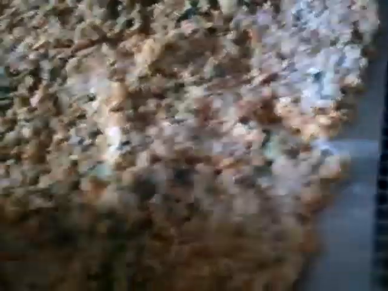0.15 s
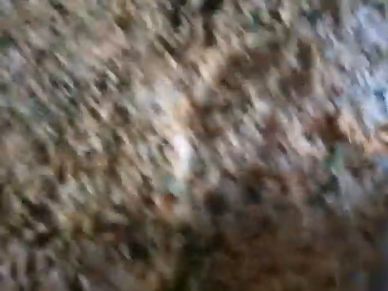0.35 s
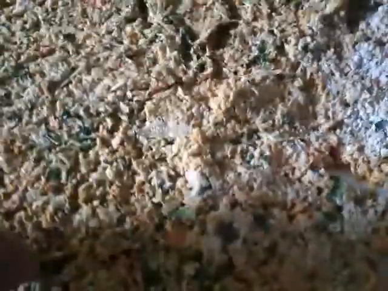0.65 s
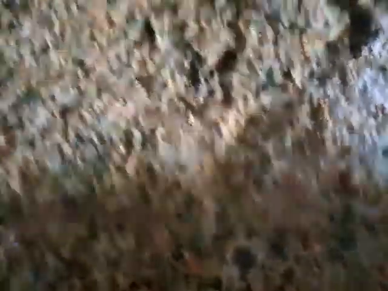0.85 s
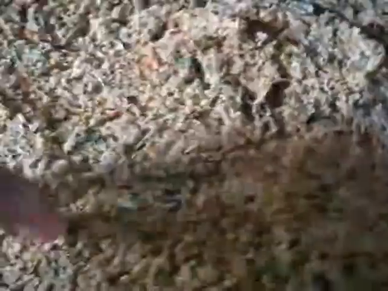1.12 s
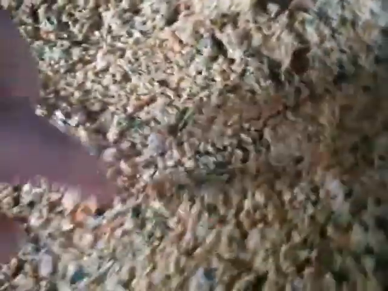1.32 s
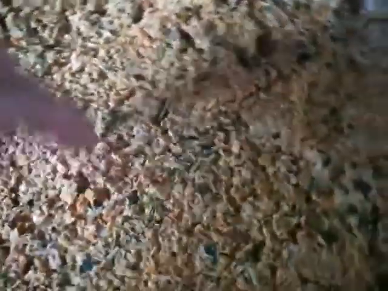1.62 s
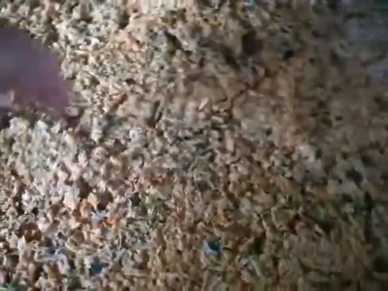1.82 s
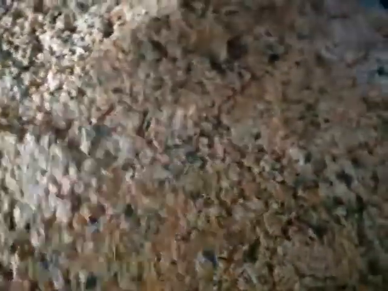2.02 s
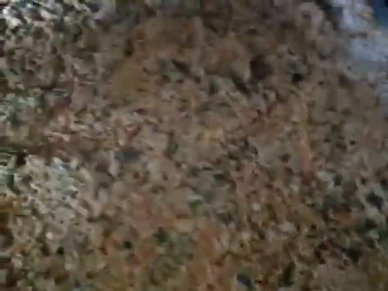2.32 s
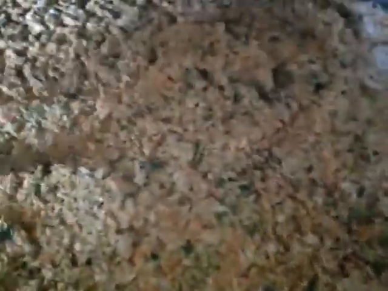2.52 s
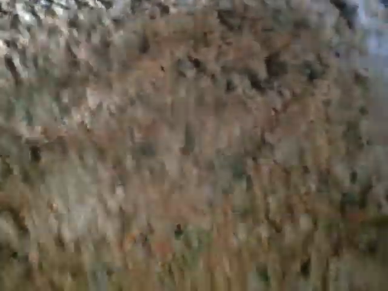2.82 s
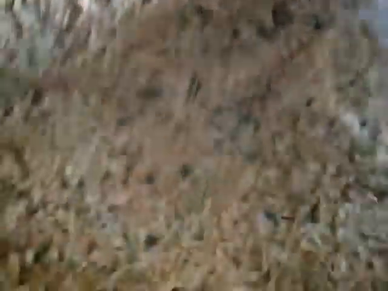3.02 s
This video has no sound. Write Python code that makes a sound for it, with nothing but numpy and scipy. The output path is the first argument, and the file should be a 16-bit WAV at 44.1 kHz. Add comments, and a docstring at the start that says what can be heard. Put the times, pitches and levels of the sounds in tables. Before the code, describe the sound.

Fingers tap and press a brittle salty layer on a tray, giving dry snaps, clicks and fine gritty crumbs, thickening into continuous crackling; close, nearly dry kitchen sound with soft rustle and thin camera whine.

```python
"""Camera hiss, a frame tick and a thin beating whistle run throughout, with paper and hand rustle.
A dried, salty crust on parchment cracks from 0.17 s; a finger rubs softly around 0.2 and 0.8 s.
From 0.21 to 2.78 s ten finger taps click and knock the tray, each leaving crumbs crackling.
From about 2.5 s the cracks, short spiky noise bursts, crowd together and go on to the end.
A faint noise-tail reverb of the kitchen follows taps, crumbs and cracks."""
import sys
import numpy as np
from scipy import signal
from scipy.fft import rfft, irfft, next_fast_len
from scipy.io import wavfile
from scipy.ndimage import map_coordinates

SR = 44100
rng = np.random.default_rng(int(sys.argv[2]) if len(sys.argv) > 2 else 0)


def inscribe(sig):
    """Save sig as 16-bit PCM at rate SR to the path in sys.argv[1].

    A 1-D sig is mono; a 2-D sig holds one channel per row.
    Samples are clipped to [-1, 1] before scaling.
    """
    pcm = np.round(np.clip(np.atleast_2d(sig).T, -1, 1) * 32767)
    wavfile.write(sys.argv[1], SR, pcm.astype(np.int16))


N = 138915

# finger taps, relative levels: start_s, click_db, knock_db, crumbs_db, crumbs_hold_s, crumbs_t60_s
TAP_EVENTS = [(0.211, -5.5, -32.5, -40, 0.019, 0.28), (0.4302, -1.5, -24.5, -39, 0.018, 0.26),
              (1.074, -14.5, -29.5, -45, 0.025, 0.24), (1.2942, -9.5, -23.5, -37, 0.017, 0.2),
              (1.5105, -28.5, -57, -50, 0.01, 0.25), (1.7086, -18.5, -23.5, -40.5, 0.019, 0.2),
              (1.9228, -6.5, -17.5, -35.5, 0.025, .15), (2.2697, -23, -40, -52, 0.011, 0.26),
              (2.5407, -6.5, -20, -35.5, 0.037, 0.091), (2.776, -3.5, -12.5, -36.5, 0.03, 0.21)]
# cracks of the crust, relative levels: start_s, level_db, bass_over_level_db, treble_over_level_db, t60_s
CRACK_EVENTS = [(0.1736, -44.5, 7, -15, 0.012), (0.2409, -51, 4, -4, 0.018),
                (0.253, -47.5, -9, -6.5, 0.0166), (0.271, -32, -29, -19, 0.021),
                (0.2958, -11, -5, 4, 0.013), (0.3263, -40, -16, 11, 0.011), (0.458, -45, -7, -14, 0.006),
                (0.6275, -1.5, -2.5, -9.5, 0.022), (0.6568, -32, 0, -10, 0.0144),
                (0.6672, -25, -9, 0, 0.006), (1.086, -69, 3, 3, 0.025), (1.116, -37, -21, 7, 0.011),
                (1.1523, -36.5, 5.5, -8, 0.0176), (1.3365, -25, -4, 1.5, 0.021),
                (1.3473, -35, -15, -8, 0.054), (1.7396, -56, -4, -8, 0.017), (1.7575, -32, -6, 2.5, 0.018),
                (1.934, -70, -8, 31, 0.006), (1.9505, -83, -6, -14, 0.006), (1.9568, -30.5, -21, -18, 0.03),
                (1.9624, -29, -0.5, 2.5, 0.018), (2.1551, -35, -0.5, -21, 0.013),
                (2.2806, -34, 6.5, 0, 0.018), (2.3206, -47, 13, -12, 0.014),
                (2.5469, -32, 15.5, -14, 0.033), (2.5693, -72, 10, -15, 0.018),
                (2.5749, -51, -4, -8, 0.015), (2.5902, -49, -11, 3, 0.014), (2.6162, -24, -1, -18, 0.021),
                (2.6199, -24.5, -18, -5, 0.015), (2.657, -30, -22, -18, 0.018),
                (2.6619, -32, 4.5, -25, 0.016), (2.7531, -21, 0, -10, 0.016),
                (2.7752, -10.5, -14, -2.5, 0.035), (2.7778, -59.5, -6, 11, 0.054),
                (2.7904, -34, -17, -24.5, 0.0075), (2.8089, -23, -5.5, -10.5, 0.054),
                (2.8396, -10, -7.5, -6.5, 0.021), (2.8599, -20, -3, -18, 0.032),
                (2.8712, -19.5, -7, -7.5, 0.03), (2.902, -44.5, 8, -18, 0.018),
                (2.911, -34.5, 9.5, -15, 0.018), (2.9314, -23.5, -4, -11, 0.021),
                (2.9602, -39.5, 0, -8, 0.02), (2.9945, -21.5, 1, -21, 0.017), (3.0115, -29, -34, 6, 0.0086),
                (3.044, -28, 1, -21, 0.018), (3.0717, -21, -2, -11, 0.012), (3.1374, -26, -0.5, 1, 0.043),
                (3.1464, -25, -15, 4, 0.018)]
LINE_HZ = 15734
SHELF_HZ = 16000


def amp(db):
    """Decibels to amplitude ratio."""
    return 10 ** (np.asarray(db) / 20)


def unit(x):
    """Scale to RMS 1."""
    return x / np.sqrt(np.mean(x ** 2) + 1e-20)


def along(points, hz):
    """Interpolate (hz, value) points on a log frequency axis."""
    point_hz, value = np.transpose(points)
    return np.interp(np.log(hz + 1), np.log(point_hz + 1), value)


def wobble(knots_per_s):
    """Smooth random curve through normal-distributed knots."""
    knots = rng.standard_normal(int(N * knots_per_s / SR) + 4)
    return map_coordinates(knots, [np.arange(N) * knots_per_s / SR])


def filtered(x, response):
    """Multiply the spectrum of x by a complex response of frequency."""
    size = next_fast_len(len(x) + SR // 2)
    spectrum = rfft(x, size) * response(np.fft.rfftfreq(size, 1 / SR))
    return irfft(spectrum, size)[:len(x)]


def coloured(x, points):
    """Minimum-phase (hz, db) colour that keeps the power of white noise."""
    gain = amp(along(points, np.fft.rfftfreq(4096, 1 / SR)))
    cepstrum = irfft(np.log(gain))
    cepstrum = cepstrum * np.r_[1, 2 * np.ones(2047), 1, np.zeros(2047)]  # fold to causal
    impulse = irfft(np.exp(rfft(cepstrum)))[:2048]
    return signal.fftconvolve(x, impulse / np.linalg.norm(impulse))[:len(x)]


def add(track, start_s, x):
    """Mix x into track in place."""
    part = track[round(start_s * SR):][:len(x)]
    part += x[:len(part)]


def taps():
    """Sharp nail pull, rounder fingertip rebound and tray ring, then a weaker second contact."""
    click_s, push_s, push_share = 0.00007, 0.00028, 0.31  # nail contact, fingertip rebound
    bounce_s, bounce_db = 0.0058, -14
    out = np.zeros(N)
    t = np.arange(-SR // 1000, SR // 100) / SR
    pull = -np.exp(-(t / click_s) ** 2)
    rebound = push_share * np.exp(-((t - 2 * push_s) / push_s) ** 2)
    click = pull + rebound
    for start_s, click_db, knock_db, *_ in TAP_EVENTS:
        for late_s, loss_db in ((0, 0), (bounce_s, bounce_db)):
            contact_s = start_s + late_s
            add(out, contact_s + t[0], amp(click_db + loss_db) * click)
            add(out, contact_s + push_s, amp(knock_db + loss_db + 20) * tray())
    return out


def tray():
    """Tray ring: decaying sine modes, each at a fresh random level; total energy 1."""
    # tray modes, relative levels: mode_hz, level_db, t60_s
    modes = [(441.8, -2, 0.1), (660.6, -0.5, 0.078), (884, -16, 0.017), (1113, -3, 0.055),
             (1318, -14, 0.055), (1500, -52, 0.061), (1798, -10.5, 0.057), (2230, -5, .015)]
    spread_db = 2.5
    t = np.arange(SR // 5) / SR
    ring = np.zeros(len(t))
    for hz, db, t60_s in modes:
        mode_db = db + spread_db * rng.standard_normal()
        ring += amp(mode_db - 60 * t / t60_s) * np.sin(2 * np.pi * hz * t)
    return ring / np.linalg.norm(ring)


def crumbs():
    """Tiny decaying grains of many pitches over a sandy bed follow taps and cracks and shake the tray."""
    # colour of the crumbs: freq_hz, gain_db
    crumb_colour = [(100, -31), (400, 7), (1000, 8), (3000, -3.5), (6000, -3.5), (11000, -8),
                    (16000, -15.5)]
    crush_db, crush_t60_s = 1.5, 0.02  # extra crumbs right under the blow
    shed_db, shed_t60_s = -34.5, 0.22  # crumbs shed by cracks
    grains_per_s, size_spread_db, bed_db, knock_db = 2500, 4, -2, -7.5
    centre_hz, reach_octaves = 6000, 1.4  # pitch range either side

    level = np.zeros(N)
    t = np.arange(SR // 2) / SR
    for start_s, _, _, db, hold_s, t60_s in TAP_EVENTS:
        add(level, start_s, amp(db - 60 * np.maximum(t - hold_s, 0) / t60_s))
        add(level, start_s, amp(db + crush_db - 60 * t / crush_t60_s))
    for start_s, db, *_ in CRACK_EVENTS:
        add(level, start_s, amp(db + shed_db - 60 * t / shed_t60_s))

    when, pitch, size = rng.random((int(grains_per_s * N / SR), 3)).T
    hz = np.minimum(centre_hz * 2 ** (reach_octaves * (2 * pitch - 1)), SHELF_HZ)[:, None]
    size = amp(-size_spread_db * np.log(0.02 + size))[:, None]  # few large, many small
    cycles = hz * t[:200]
    shapes = size * np.sqrt(hz) * np.exp(-cycles) * np.sin(2 * np.pi * cycles)
    at = (when * N).astype(int)[:, None] + np.arange(shapes.shape[1])
    grains = unit(np.bincount(at.ravel(), shapes.ravel(), N)[:N])

    bed = amp(bed_db + 3.5 * wobble(300)) * rng.standard_normal(N)
    grit = level * (grains + bed)
    knocks = signal.fftconvolve(grit, tray())[:N]
    return coloured(grit, crumb_colour) + amp(knock_db) * knocks


def cracks():
    """Each crack is one spiky noise burst, coloured as crust, salt grains, dry bass and tray ring."""
    # body of a crack: freq_hz, gain_db
    crust_colour = [(800, -43), (1500, 2), (3000, 1.5), (5500, -9), (8000, -8), (16000, -50.5)]
    # treble of a crack, salt grains: freq_hz, gain_db
    salt_colour = [(3000, -53.5), (6000, 6), (10000, -2), (13000, -14.5), (16000, -9)]
    # dry bass of a crack: freq_hz, gain_db
    bass_colour = [(100, -44), (400, -12), (650, 0), (1100, 0.5), (1600, -5), (2500, -19.5), (16000, -62)]
    # which tray modes a crack stirs: freq_hz, gain_db
    ring_colour = [(100, -48), (440, -25), (600, 2.5), (720, 1), (1000, -1), (2500, -8.5), (16000, -6.5)]
    rise_s, trim_db, ring_db, spikiness = 0.00089, -5, -11.5, 0.5
    body, salt, bass, ring = np.zeros((4, N))
    t = np.arange(SR // 10) / SR
    for start_s, level_db, bass_db, treble_db, t60_s in CRACK_EVENTS:
        noise, spikes = rng.standard_normal((2, len(t)))
        shape = amp(level_db + trim_db - 60 * t / t60_s) * (1 - np.exp(-t / rise_s))
        burst = unit(noise * np.exp(spikiness * spikes) * shape)
        burst = burst * np.sqrt(np.mean(shape ** 2))  # RMS of the envelope
        add(body, start_s, burst)
        add(salt, start_s, amp(treble_db) * burst)
        add(bass, start_s, amp(bass_db) * burst)
        add(ring, start_s, amp(bass_db + ring_db) * signal.fftconvolve(burst, tray()))
    dry_crack = coloured(body, crust_colour) + coloured(salt, salt_colour) + coloured(bass, bass_colour)
    return dry_crack + coloured(ring, ring_colour)


def rub():
    """Finger rubbing the paper: dull noise swells with a lumpy level."""
    # colour of the rubs: freq_hz, gain_db
    rub_colour = [(60, -46), (200, 4), (350, 13), (600, -6.5), (2000, -5), (7000, -15), (16000, -13)]
    # soft rubs, relative levels: crest_s, level_db, fade_s
    swells = [(0.199, -46.5, 0.029), (0.799, -53, .08)]
    rise_s = 0.01
    t = np.arange(N) / SR
    shape = np.zeros(N)
    for crest_s, db, fade_s in swells:
        width_s = np.where(t < crest_s, rise_s, fade_s)
        shape += amp(db) * np.exp(-((t - crest_s) / width_s) ** 2)
    return amp(2 * wobble(80)) * shape * coloured(rng.standard_normal(N), rub_colour)


def rustle():
    """Soft noise of paper and hand over the kitchen's hush, patchy by two random level curves."""
    # level of paper and hand: time_s, level_db
    level_points = [(0.0, -63), (0.17, -63), (0.37, -57), (0.67, -64.5), (0.82, -54.5), (1.07, -62),
                    (1.24, -60), (1.47, -61), (2.38, -62.5), (2.6, -64), (2.65, -56), (2.73, -62),
                    (2.77, -52), (2.84, -59), (2.96, -55), (3.06, -64), (3.15, -59)]
    # colour of the rustle: freq_hz, gain_db
    paper_colour = [(20, -32), (60, -13), (150, 0.5), (300, -2.5), (600, -2.5), (1200, -7.5), (3000, -10.5),
                    (8000, -14.5), (16000, -55)]
    point_s, point_db = np.transpose(level_points)
    level_db = np.interp(np.arange(N) / SR, point_s, point_db)
    level_db = level_db + 1.2 * wobble(24) + 1.5 * wobble(110)
    return amp(level_db) * coloured(rng.standard_normal(N), paper_colour)


def room(x):
    """Kitchen reverb: a noise tail whose every frequency decays at its own speed."""
    # decay of the kitchen: freq_hz, t60_s
    decay = [(200, 0.87), (1000, 0.22), (4000, 0.28), (12000, 0.3)]
    hz, t, noise = signal.stft(rng.standard_normal(SR // 2), SR, nperseg=256)
    fade = amp(-60 * t / along(decay, hz)[:, None])
    tail = signal.istft(noise * fade, SR, nperseg=256)[1]
    delayed = np.pad(x, (200, 0))  # samples
    return signal.fftconvolve(delayed, tail / np.linalg.norm(tail))[:N]


def camera():
    """Coloured hiss, a band-passed impulse per frame and two beating sines near the line rate."""
    # colour of the hiss: freq_hz, gain_db
    hiss_colour = [(20, -8), (100, 5), (1000, 2), (5000, -8), (10000, -5), (13000, -5), (16000, -3)]
    frame_hz, first_tick_s, tick_hz, tick_width_hz = 29.97, 0.0191, 7870, 1300
    beat_hz, beat_crest_s = 13, 0.0425
    tick_db, whistle_db, second_db, hiss_db = -21.5, -70, -4.5, -67  # second whistle re first
    t = np.arange(N) / SR
    ticks = np.zeros(N)
    tick_s = np.arange(first_tick_s, t[-1], 1 / frame_hz)
    ticks[np.round(tick_s * SR).astype(int)] = amp(tick_db)

    def band(f):
        width = 1j * f * tick_width_hz
        return (width / (tick_hz ** 2 - f * f + width)) ** 2

    ticks = filtered(ticks, band)
    turn = 2 * np.pi * (t - beat_crest_s)
    whistle = np.cos(LINE_HZ * turn) + amp(second_db) * np.cos((LINE_HZ + beat_hz) * turn)
    hiss = coloured(rng.standard_normal(N), hiss_colour)
    return ticks + amp(whistle_db) * whistle + amp(hiss_db) * hiss


def scene():
    """Sum the crust's sounds, their reverb, the paper and the camera."""
    room_db = -23
    crust = taps() + crumbs() + cracks()
    return (crust + amp(room_db) * room(crust) + rustle() + rub() + camera())[None]


def record(dry):
    """Notch at half the line rate, bass roll-off, treble shelf and band limit."""
    notch_hz, notch_width_hz = LINE_HZ / 2, 420
    low_hz, shelf_db, top_hz = 117.4, -28, 16800

    def response(f):
        gap = notch_hz ** 2 - f * f
        notch = gap / (gap + 1j * f * notch_width_hz)
        low_cut = (1j * f / (low_hz + 1j * f)) ** 2
        edge = np.where(f < SHELF_HZ, 1, amp(shelf_db)) * (f < top_hz)
        return notch * low_cut * edge

    return filtered(dry[0], response)[None]


dry = scene()
out = record(dry)
inscribe(out)
```